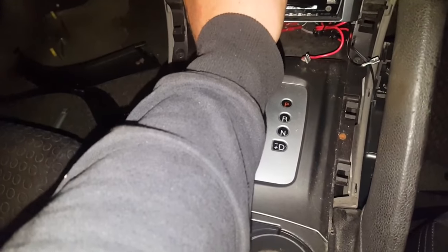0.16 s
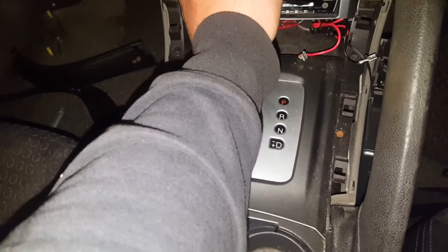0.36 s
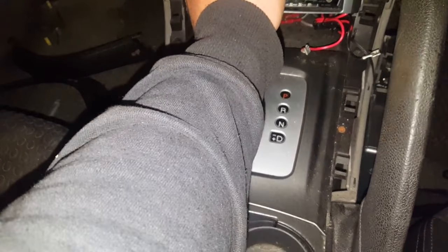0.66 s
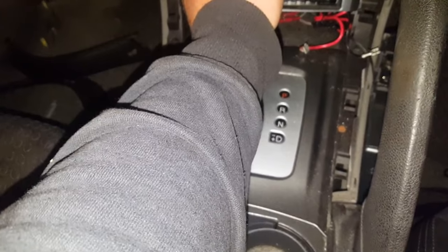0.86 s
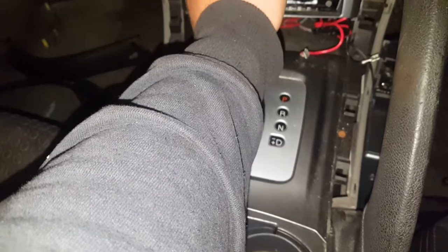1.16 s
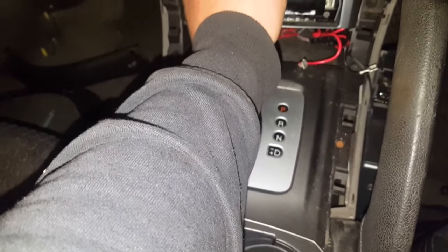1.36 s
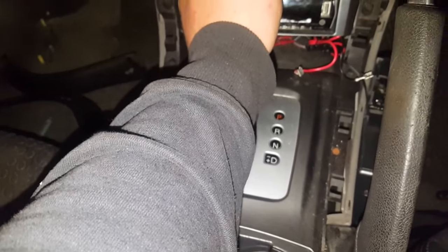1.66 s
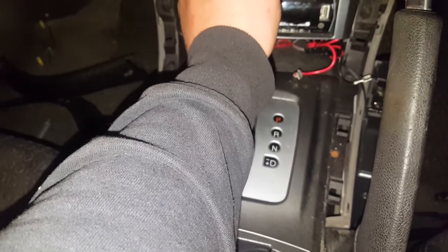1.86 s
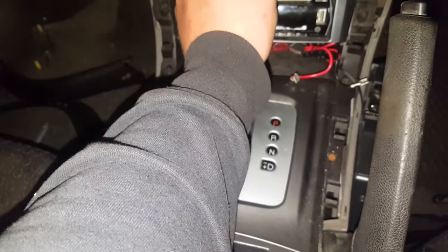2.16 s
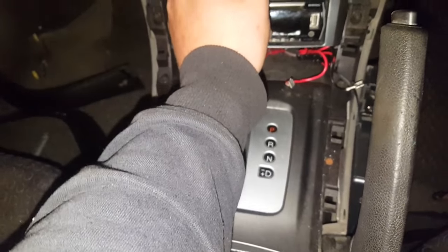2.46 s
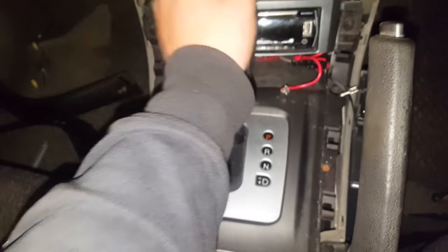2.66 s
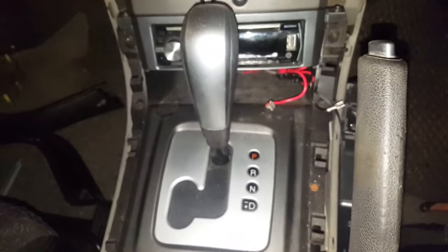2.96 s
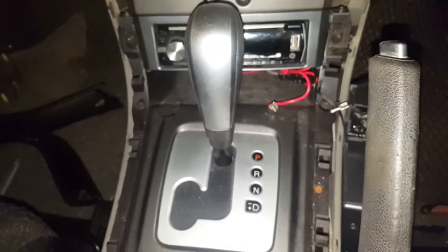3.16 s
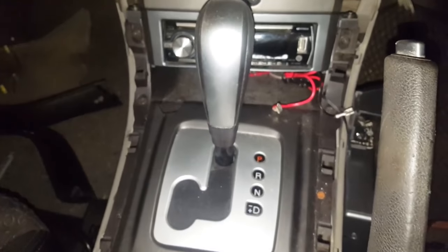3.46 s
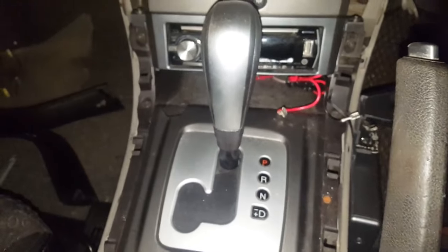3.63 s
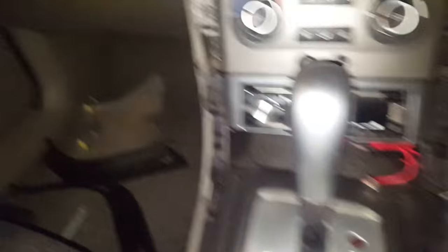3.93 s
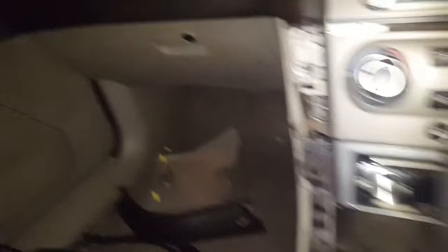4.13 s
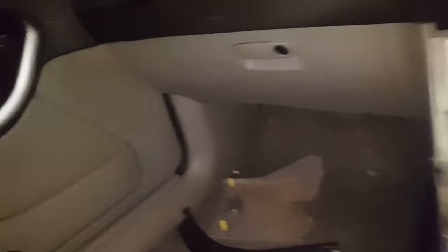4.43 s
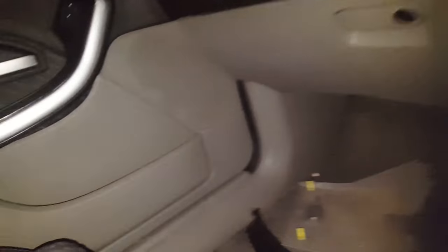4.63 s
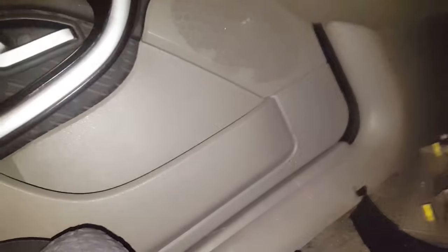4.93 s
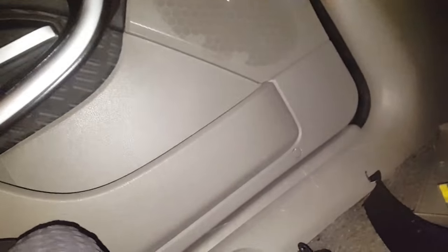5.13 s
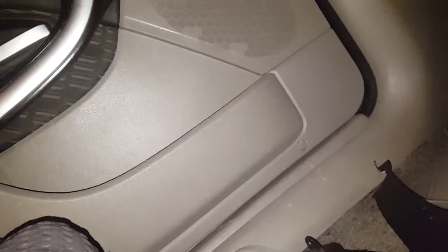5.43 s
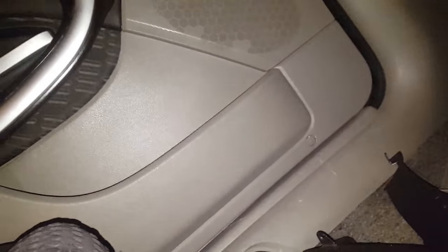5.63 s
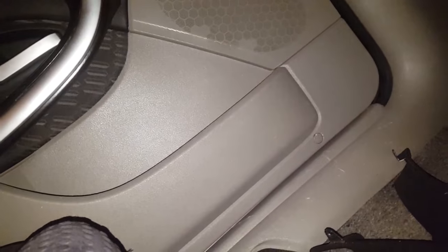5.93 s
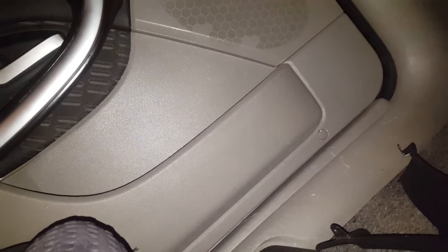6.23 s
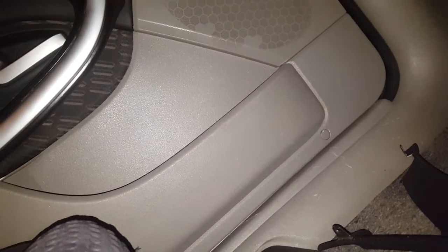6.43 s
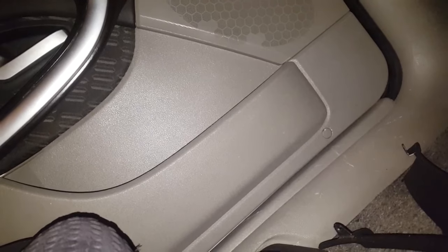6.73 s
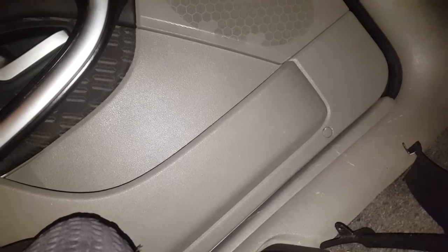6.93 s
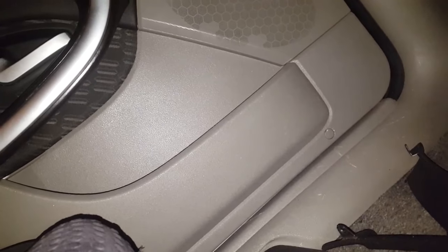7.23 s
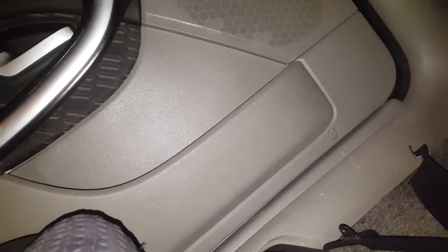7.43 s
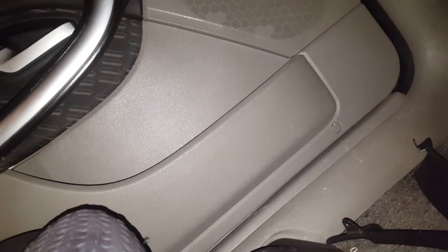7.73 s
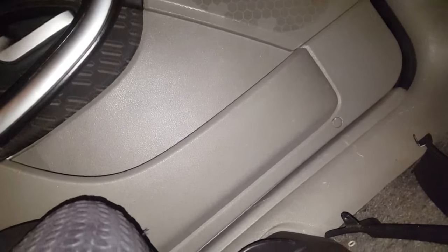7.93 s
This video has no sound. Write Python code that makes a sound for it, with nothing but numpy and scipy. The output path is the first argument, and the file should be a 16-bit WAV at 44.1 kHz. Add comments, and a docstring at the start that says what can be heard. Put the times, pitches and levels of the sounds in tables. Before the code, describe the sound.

A car engine idles throughout about eight seconds, heard within the enclosed cabin on a handheld phone. Dull, slightly irregular knocks thud through the body about eleven times a second, over low boom, wavering drone, bulkhead rumble and gentle vent hiss. From 0.4 to 1.2 seconds, heavy muffled bumps hit the microphone, strongest near 0.6 and 0.7, with low grip rumble. Faint cloth brushing follows around 2.7 to 3.4. Soft console thuds and small plastic clicks come at 3.6, then a sharper, louder trim knock at 3.95. Cloth rubs as the phone moves; further taps land near 4.9, 5.3 and 5.4. The low boom swells around 4.7 and 5.9. From about 5.4, near the footwell, the engine is fuller, the hiss softer, and knocks with rattling panels become stronger, with a light tap at 6.3, continuing to the end.

```python
"""A car idles: heard from the driver's seat, a dull knock thuds through the body about eleven times a second.
Each knock is a few short resonances of body and panels; the firings boom and hum as sines in the cabin, over
a rumble of coloured noise. Vent hiss is coloured noise with a few narrow tones. The hand-held phone is bumped,
brushes past clothes (bands of noise) and taps trim and console (ringing modes) on its way from the centre
console towards the footwell, where the engine is louder and the hiss is softer."""
import sys
import numpy as np
from scipy import signal
from scipy.fft import rfft, irfft
from scipy.io import wavfile
from scipy.ndimage import uniform_filter1d

SR = 44100
rng = np.random.default_rng(int(sys.argv[2]) if len(sys.argv) > 2 else 0)


def int16_out(signal):
    """Quantize to a 16-bit WAV file."""
    q = np.round(np.clip(np.atleast_2d(signal).T, -1, 1) * 32767)
    wavfile.write(sys.argv[1], SR, q.astype(np.int16))


N = 356813
TIME = np.arange(N) / SR
FREQ = np.maximum(np.arange(N // 2 + 1) * SR / N, 1)


def undb(db):
    """Decibels to gain."""
    return 10 ** (np.asarray(db) / 20)


def curve(rows):
    """Rows (time [s], value) joined by straight lines."""
    return np.interp(TIME, *np.transpose(rows))


def unit(x):
    """Scale to rms 1."""
    return x / np.sqrt(np.mean(x ** 2))


def add(out, s, x):
    """Mix x into out from time s."""
    i = int(np.clip(s * SR, 0, N - 1))
    out[i:i + len(x)] += x[:N - i]


def swell(s, half):
    """A smooth rise and fall around time s."""
    return np.exp(-((TIME - s) / half) ** 2)


def walk(rate):
    """Smooth random motion of rms 1, taking a new random value about rate times a second."""
    k = int(SR / rate)
    steps = np.repeat(rng.standard_normal(N // k + 1), k)
    smooth = uniform_filter1d(uniform_filter1d(steps, k), k)
    return unit(smooth[:N])


def band(x, lo_hz, hi_hz, order=2):
    """Causal band-pass."""
    edges = [lo_hz, min(hi_hz, SR / 2 - 1)]
    return signal.sosfilt(signal.butter(order, edges, "band", fs=SR, output="sos"), x)


def heard(x, table, place):
    """Colour x by a spectrum that glides from the console's (scaled to rms 1) to the footwell's."""
    hz, *columns = np.transpose(table)
    # roll off below the first and above the last listed frequency
    ends = 1 / (1 + (hz[0] / FREQ) ** 4) / (1 + (FREQ / hz[-1] / 2) ** 4)
    spectrum = rfft(x)
    gains = [undb(np.interp(np.log(FREQ), np.log(hz), db)) for db in columns]
    console, footwell = [irfft(spectrum * gain * ends, N) for gain in gains]
    return ((1 - place) * console + place * footwell) / np.std(console)


def ring(modes, scatter):
    """One soft blow: each resonance swells for a few ms and dies; no two blows land alike."""
    t = TIME[:SR // 10]
    out, start = 0, rng.random()
    for hz, width, db in modes:
        age = np.pi * width * t
        envelope = age ** 2 * np.exp(-age)
        pitch = hz * (1 + scatter * rng.standard_normal())
        # all modes share one phase at the top of their swell
        turn = pitch * (t - 2 / (np.pi * width)) + start
        out = out + undb(db) * envelope * np.exp(2j * np.pi * turn)
    return out.real / np.abs(out).max()


def strike(modes, tilt_db, crack_db, contact_s):
    """A hard contact sets all modes off together, tilted by the hardness (peak 1), with a short crack."""
    t = TIME[:SR // 8]
    out = 0
    for hz, t60, db in modes:
        level = undb(db + tilt_db * np.log2(hz / modes[0][0]))
        decay = np.exp(-np.log(1000) * t / t60)
        pitch = hz * (1 + 0.013 * rng.standard_normal())
        out = out + level * decay * np.cos(2 * np.pi * pitch * t)
    push = np.sin(np.pi * np.minimum(t / contact_s, 1)) ** 2
    out = signal.fftconvolve(out, push)[:len(t)]
    crack = band(rng.standard_normal(len(t)), 600, 11400) * np.exp(-t / 0.0063)
    return out / np.abs(out).max() + undb(crack_db) * crack


# engine speed: (time [s], firing rate [Hz])
FIRING_RATE = [(0.0, 33.65), (0.7, 33.75), (1.2, 33.92), (1.65, 33.5), (2.2, 34.7), (2.85, 34.51),
               (3.4, 33.85), (4.1, 34.64), (4.5, 32.9), (5.1, 34.24), (5.75, 31.39), (6.3, 32.9),
               (6.6, 32.23), (7.1, 32.12), (7.55, 32.6), (8.09, 33.3)]
# boom at the firing rate, swelling where the phone meets a standing wave: (time [s], rms level [dB])
BOOM_LEVEL = [(0, -41), (3.9, -49.5), (4.55, -36.5), (4.72, -28), (5.1, -41.5), (5.3, -51), (5.5, -33.5),
              (5.95, -29), (6.55, -44), (6.8, -33.5), (8.09, -39.5)]
# drone at three times the firing rate, swelling and fading through the cabin's standing waves:
# (time [s], rms level before dips and wavering [dB])
DRONE_LEVEL = [(0, -41), (1.3, -40.5), (3.2, -41.5), (4.5, -48.5), (4.8, -37.5), (5.15, -37), (5.4, -47),
               (6.1, -40), (6.6, -52), (7.3, -43)]
# hum, rms before wavering: (multiple of firing rate, level at console [dB], level at footwell [dB])
HUM_ORDERS = [(2, -51, -49.5), (4, -49.5, -38.5), (5, -49, -44), (6, -54, -48), (7, -59.5, -49),
              (9, -61, -60.5), (10, -59, -60), (11, -67, -53), (12, -75.5, -52), (21, -74.5, -64.5)]
# rumble through the bulkhead, relative density:
# (frequency [Hz], at console [dB per Hz], at footwell [dB per Hz])
RUMBLE_COLOUR = [(19.8, -31, -22), (49.4, -12.5, 2.5), (94, -2, 1), (144, -7, -1.5), (180, -14, 0.5),
                 (247, -6.5, 2), (277, -13.5, -3.5), (357, -15.5, -2.5), (402, -19, -14.5),
                 (460, -14.5, -11), (594, -24, -16), (682, -27.5, -22), (795, -33, -29), (1490, -42, -32.5),
                 (2960, -79, -45.5)]
# (time [s], rumble level before dips, trim and move to the footwell [dB])
RUMBLE_FADER = [(0, -37.5), (.7, -36.5), (2.6, -38), (3.5, -37.5), (3.85, -35.5), (4.1, -40.5), (4.5, -43),
                (4.75, -35.5), (5, -43.5), (5.3, -41), (5.95, -44.5), (6.3, -38.5), (6.6, -43),
                (7.4, -39.5), (8.09, -42)]
# a dip just before each knock, and how far drone and rumble drop in it
LULL_LEAD_S, LULL_HALF_S, LULL_DRONE_DB, LULL_RUMBLE_DB = 0.02, 0.0064, -11.5, -3


def engine(place, wander=0.35):
    """Uneven firings boom, drone and hum on their multiples and pump a rumble through the bulkhead."""
    turn = 2 * np.pi * (np.cumsum(curve(FIRING_RATE)) / SR + 0.01 * walk(9))
    lull = sum(swell(s - LULL_LEAD_S, LULL_HALF_S) for s, _, _ in KNOCK_TIMES)
    lull = lull - lull.mean()  # keeps the average level in dB
    boom = undb(curve(BOOM_LEVEL)) * np.sin(turn)
    drone_db = curve(DRONE_LEVEL) + LULL_DRONE_DB * lull + 1.56 * walk(14)
    drone = undb(drone_db) * np.cos(3 * turn + 0.13 * walk(20))
    hum = 0
    for order, console_db, footwell_db in HUM_ORDERS:
        level = undb(console_db + (footwell_db - console_db) * place + 2.33 * walk(16))
        phase = wander * walk(18) + 2 * np.pi * rng.random()
        hum = hum + level * np.sin(round(order) * turn + phase)
    throb = undb(0.65 * np.cos(turn) + 0.99 * walk(35))
    rumble = heard(rng.standard_normal(N) * throb, RUMBLE_COLOUR, place)
    rumble = rumble * undb(curve(RUMBLE_FADER) + LULL_RUMBLE_DB * lull - 3.5)
    return np.sqrt(2) * (boom + drone + hum) + rumble  # root 2 turns sine peaks into rms levels


# vent air, relative density: (frequency [Hz], at console [dB per Hz], at footwell [dB per Hz])
AIR_COLOUR = [(295, 7, -13), (800, 3.5, 4.5), (1340, 2.5, -2), (1940, 0.5, -2), (2080, -3, -2.5),
              (3220, -3, -10), (3560, -9, -18.5), (6100, -12, -16), (7200, -14, -20), (9400, -18, -20),
              (10300, -21, -24.5), (15500, -24.5, -26.5)]
# (time [s], hiss level before trim and move to the footwell [dB])
AIR_FADER = [(0, -59), (.9, -57.5), (2.2, -59.5), (3.1, -57), (3.7, -59), (5, -55.5), (5.6, -60.5)]
# narrow tones in the hiss; an end past the last second means the tone holds throughout:
# (frequency [Hz], width [Hz], rms level before any fade [dB], end [s])
AIR_TONES = [(6470, 420, -70, 4.3), (2175, 270, -63.5, 5.2), (1312, 20, -69.5, 11)]


def vents(place):
    """Fan-blown air hisses with a slight flutter and three narrow tones; two fade out, the third holds."""
    flow = rng.standard_normal(N) * undb(0.76 * walk(30))
    out = heard(flow, AIR_COLOUR, place) * undb(curve(AIR_FADER) + 2.5 + 3.8 * place)
    for hz, width, db, end in AIR_TONES:
        tone = unit(band(rng.standard_normal(N), hz - width / 2, hz + width / 2, order=1))
        out = out + undb(db) * tone / (1 + np.exp((TIME - end) / 0.18))
    return out


# dull bumps on the microphone: (time [s], peak level [dB], half width [ms])
MIC_BUMPS = [(0.4, -20, 2.9), (0.572, -6.5, 5), (0.669, -14.5, 4.5), (0.703, -15, 5.5), (0.731, -7.5, 4.6),
             (0.769, -16, 2.6), (0.928, -14.5, 4.76), (0.965, -15.5, 4.7), (1.035, -15, 5.1),
             (1.052, -13, 3.5), (1.131, -15, 5.1), (1.158, -20, 7.4), (1.187, -12, 5.1), (3.772, -19, 2.7)]
# the hand shifts its grip on the phone: (time [s], half length [s], rumble level [dB])
GRIP_SHIFTS = [(.87, 0.059, -26.5), (1.05, 0.19, -29.5), (3.81, 0.067, -35), (4.65, 0.19, -39),
               (5.2, 0.16, -32)]
# every bump shakes the phone for a moment: rumble level against the bump, half length
SHAKE_DB, SHAKE_S = -18, 0.035
HOLD_DB = -47  # rumble of the hand at rest


def handling():
    """Each bump is one pressure swell with a dip on either side; bumps and grip shifts stir a low rumble."""
    stirs = GRIP_SHIFTS + [(s, SHAKE_S, db + SHAKE_DB) for s, db, _ in MIC_BUMPS]
    power = undb(HOLD_DB) ** 2 + sum((undb(db) * swell(s, half_s)) ** 2 for s, half_s, db in stirs)
    out = unit(band(rng.standard_normal(N), 22.0, 87.7)) * np.sqrt(power)
    half = SR // 20
    for s, db, width_ms in MIC_BUMPS:
        u = np.arange(-half, half) / SR * 1000 / width_ms
        pressure = (1 - u ** 2) / (1 + u ** 2 / 3) ** 3
        add(out, s - half / SR, undb(db) * pressure)
    return out


# the knocks, one to about every third firing:
# (time [s], thud level before trim [dB], panel clatter level before trim [dB])
KNOCK_TIMES = [(0.02, -35.5, -39), (0.099, -29.5, -41), (0.191, -26.5, -35.5), (0.288, -31, -35.5),
               (0.378, -25.5, -36), (0.471, -25, -36), (0.564, -30, -33), (0.657, -20, -36.5),
               (0.753, -30.5, -48), (0.839, -25, -56), (0.931, -28, -36), (1.035, -27, -47),
               (1.115, -24, -50), (1.216, -26, -37), (1.305, -26.5, -39), (1.393, -30, -38),
               (1.485, -23, -40), (1.577, -26, -36.5), (1.68, -27.5, -45), (1.769, -26.5, -34),
               (1.856, -30, -36.5), (1.953, -26, -34), (2.039, -29, -33.5), (2.134, -27.5, -39),
               (2.227, -27.5, -48), (2.317, -24, -42), (2.388, -27, -40), (2.494, -24.5, -43),
               (2.588, -27, -35.5), (2.672, -25, -38), (2.763, -25, -39), (2.855, -26.5, -37),
               (2.943, -26.5, -35), (3.026, -30.5, -42), (3.127, -25, -44), (3.216, -27, -44),
               (3.314, -29.5, -48), (3.399, -26, -48), (3.491, -27.5, -41), (3.585, -31.5, -30),
               (3.674, -35, -43.5), (3.771, -29.5, -39), (3.857, -27.5, -48), (3.944, -30.0, -35),
               (4.017, -29, -46), (4.114, -27.5, -45), (4.192, -38, -50), (4.283, -28.5, -38),
               (4.413, -31.5, -43), (4.636, -35, -34.5), (4.724, -37, -37), (4.813, -30.5, -39),
               (4.999, -29, -54), (5.111, -33, -33.5), (5.219, -24, -32), (5.329, -26, -40),
               (5.426, -27, -41), (5.518, -23.5, -37), (5.626, -23.5, -40), (5.727, -25.5, -28),
               (5.822, -32, -39), (5.932, -32, -38), (6.025, -27, -30.5), (6.122, -29.5, -33.5),
               (6.182, -23, -29.5), (6.303, -24.5, -26.5), (6.369, -29, -27), (6.494, -29, -30),
               (6.598, -34, -35), (6.688, -41, -30), (6.776, -21, -29), (6.872, -22, -25.5),
               (6.98, -22.5, -32), (7.074, -23, -30), (7.176, -24.5, -45), (7.267, -32, -29.5),
               (7.361, -21, -36), (7.456, -23.5, -25), (7.554, -25, -31), (7.667, -21.5, -48),
               (7.746, -22.5, -31), (7.841, -19, -29), (7.936, -31.5, -30.5), (8.032, -20, -30.5)]
# the body a knock rings, before pitch drop and scatter: (frequency [Hz], width [Hz], relative level [dB])
BODY_MODES = [(141.3, 54.2, -2), (162.9, 54.4, -2.5)]
# the panels it rattles, before scatter: (frequency [Hz], width [Hz], relative level [dB])
PANEL_MODES = [(238.5, 72.9, 1), (323.5, 93.7, -2.5), (370, 79.2, -5), (500, 123.4, -16.5)]
# weaker firings on either side, before scatter: (time from the knock [s], level against its table thud [dB])
SIDE_FIRINGS = [(-.029, -9), (.028, -7)]
# pitches that cancel between the cabin walls: (frequency [Hz], width [Hz])
CABIN_NULLS = [(193, 23), (440, 50)]


def knocks(place, rattle_s=.008, rattle_lead_s=0.00802, thud_db=1.14, clatter_db=1, footwell_drop=0.042):
    """Panels rattle in three dying blows around a body thud between weaker firings, deeper in the footwell."""
    out = np.zeros(N)
    for s, thud, clatter in KNOCK_TIMES:
        pitch = 1 - footwell_drop * np.interp(s, TIME, place)
        body = [(hz * pitch, width, db) for hz, width, db in BODY_MODES]
        add(out, s, undb(thud + thud_db) * ring(body, scatter=0.021))
        for apart_s, db in SIDE_FIRINGS:
            late, size = rng.standard_normal(2)
            level = undb(thud + db + 1.4 * size)
            add(out, s + apart_s + 0.0018 * late, level * ring(body, scatter=0.037))
        for k, slip in enumerate(rng.random(size=3)):
            blow_s = s - rattle_lead_s + rattle_s * (k + slip / 2)
            level = undb(clatter + clatter_db - 4.5 * k)
            add(out, blow_s, level * ring(PANEL_MODES, scatter=0.032))
    for hz, width in CABIN_NULLS:
        out = signal.lfilter(*signal.iirnotch(hz, hz / width, fs=SR), out)
    return out


# clothes brushing past the phone:
# (time [s], half length [s], level before uneven catching [dB], centre [Hz], width [Hz])
CLOTH_STROKES = [(0.56, 0.043, -62, 3478, 5000), (.65, 0.44, -60.5, 1420, 200),
                 (0.923, 0.13, -62, 3500, 5000), (2.69, 0.11, -68, 8750, 1500),
                 (2.72, 0.1, -64, 7504, 7000), (3.053, 0.067, -59, 6000, 7000), (3.1, 0.16, -59, 2130, 800),
                 (3.37, 0.13, -57.5, 2100, 700), (3.199, .2, -76, 2800, 350), (3.25, .25, -80, 4380, 160),
                 (3.864, 0.19, -60.5, 1950, 700), (3.85, 0.086, -63.5, 2770, 375),
                 (4.15, 0.41, -70, 8900, 2199), (4.32, 0.24, -66, 2190, 150),
                 (4.716, 0.11, -59.5, 1380, 220), (4.95, .3, -70, 3118, 400),
                 (4.984, 0.18, -60.5, 1460, 800), (4.95, 0.48, -80, 4300, 4970),
                 (5.214, 0.17, -63, 3850, 4000), (5.722, 0.015, -66, 2000, 900),
                 (6.324, 0.1, -61, 1880, 250)]


def clothes():
    """Cloth slides in short strokes, each a resonant band of noise; its fibres catch unevenly."""
    out, catch = 0, undb(2.24 * walk(160) + 1.2 * walk(25))
    for s, half, db, hz, width in CLOTH_STROKES:
        b, a = signal.iirpeak(hz, hz / min(width, SR / 4), fs=SR)
        stroke = unit(signal.lfilter(b, a, band(rng.standard_normal(N), 590, 7200)))
        out = out + undb(db) * swell(s, half) * stroke
    return out * catch


# soft thuds on the console: (time [s], peak level [dB], brightness [dB per octave])
CONSOLE_THUDS = [(3.585, -20.5, 2.5), (3.594, -23.5, -9), (3.954, -23.5, -1), (4.866, -22, 2),
                 (4.877, -25.5, 7.5), (5.29, -26, 0), (5.299, -22, 2), (5.322, -29, 7), (6.309, -25, -6)]
# what the hollow console rings with, before tilt and scatter:
# (frequency [Hz], width [Hz], relative level [dB])
CONSOLE_MODES = [(168.6, 58.4, 3), (236, 68.6, 2.5), (392, 73.7, -6), (620, 175, -19)]
# taps on the trim, peak without the crack: (time [s], peak level [dB], brightness [dB per octave])
TRIM_TAPS = [(3.588, -30, 1), (3.598, -28, 2.5), (3.943, -26, -2), (3.947, -19.5, 3.5), (3.9566, -12.5, -7),
             (4.869, -37, 8), (5.297, -29, 5), (5.427, -38, 13)]
# what the trim rings with, before tilt and scatter: (frequency [Hz], t60 [s], relative level [dB])
TRIM_MODES = [(136, 0.049, 9), (257, 0.029, 3), (364, 0.06, 2), (533, 0.01, -20), (625, .014, -12),
              (830, 0.023, -5), (1110, 0.016, -25), (1350, 0.0095, 9)]
# loose bits of trim, each on its own note before scatter:
# (time [s], peak level [dB], frequency [Hz], width [Hz])
LOOSE_TOCKS = [(.967, -38, 690, 260), (3.349, -39, 740, 300), (3.586, -41, 1093, 220),
               (3.603, -41.5, 640, 110), (4.872, -43, 1690, 219), (5.429, -36.5, 1100, 900),
               (5.432, -45.5, 2650, 318), (5.429, -54, 4120, 250), (7.744, -37, 600, 300)]
# small plastic clicks, peak without the crack: (time [s], peak level [dB], brightness [dB per octave])
PLASTIC_CLICKS = [(.967, -49, 2), (3.59, -38, -2), (3.6, -50, 0), (3.946, -41, 1), (3.958, -38, -5),
                  (4.868, -41, 7), (5.428, -36, -1), (5.723, -44, -16), (6.31, -51, 1), (6.56, -48, 7)]
# what a click rings with, before tilt and scatter: (frequency [Hz], t60 [s], relative level [dB])
CLICK_MODES = [(1436, 0.025, 1), (1800, 0.033, 3), (2500, 0.045, -2), (2660, 0.037, -2.5), (3350, .02, -11),
               (3880, 0.045, -9), (7400, .025, -14)]


def taps():
    """Soft thuds on the hollow console, hard taps on trim, tocks of loose parts and small bright clicks."""
    out = np.zeros(N)
    lowest_hz = CONSOLE_MODES[0][0]
    for s, db, tilt_db in CONSOLE_THUDS:
        modes = [(hz, width, gain + tilt_db * np.log2(hz / lowest_hz)) for hz, width, gain in CONSOLE_MODES]
        add(out, s, undb(db) * ring(modes, scatter=0.025))
    for s, db, tilt_db in TRIM_TAPS:
        add(out, s, undb(db) * strike(TRIM_MODES, tilt_db, crack_db=-44, contact_s=0.0012))
    for s, db, hz, width in LOOSE_TOCKS:
        add(out, s, undb(db) * ring([(hz, width, 0)], scatter=0.005))
    for s, db, tilt_db in PLASTIC_CLICKS:
        add(out, s, undb(db) * strike(CLICK_MODES, tilt_db, crack_db=-17.5, contact_s=0.000099))
    return out


# where the phone is held: (time [s], place from 0 at the console to 1 at the footwell)
PHONE_PLACE = [(0, 0.021), (4.2, 0.0083), (4.8, 0.18), (5.15, 0.68), (5.45, 0.97), (8.09, 0.91)]


def scene():
    """Everything in the cabin, in one channel."""
    place = np.clip(curve(PHONE_PLACE), 0, 1)
    car = engine(place) + vents(place) + knocks(place)
    phone = handling() + clothes() + taps()
    return (car + phone)[None]


TOP_HZ = 15700  # upper limit of the phone's microphone


def record(dry):
    """The phone's microphone drops the deepest bass and cuts the top steeply."""
    thin = signal.sosfilt(signal.butter(1, 8, "high", fs=SR, output="sos"), dry)
    return signal.sosfilt(signal.ellip(10, .2, 70, TOP_HZ, fs=SR, output="sos"), thin)


dry = scene()
out = record(dry)
int16_out(out)
```